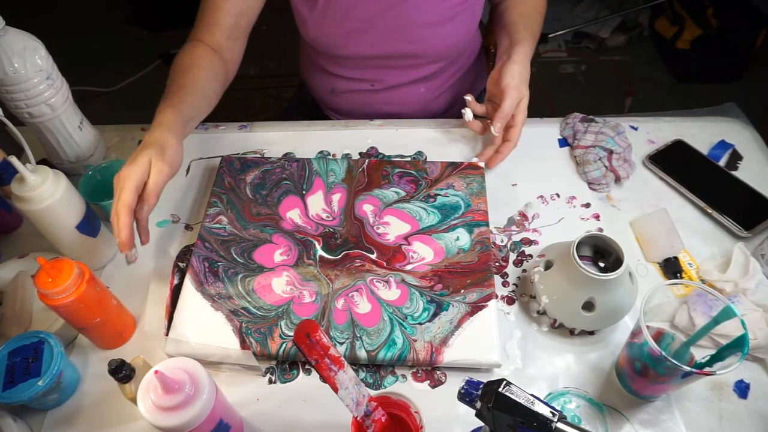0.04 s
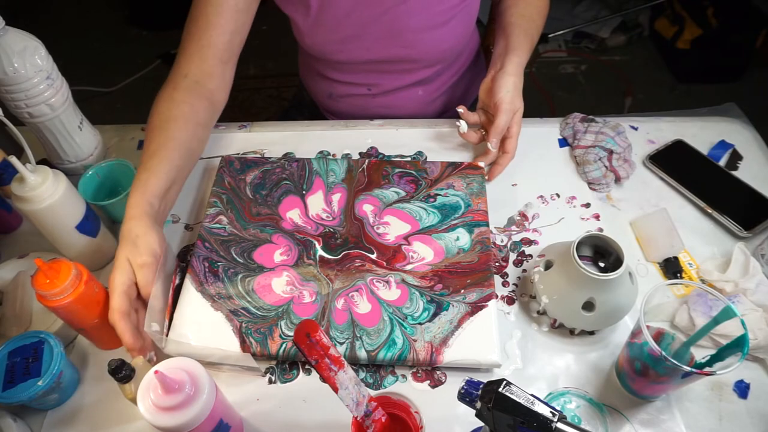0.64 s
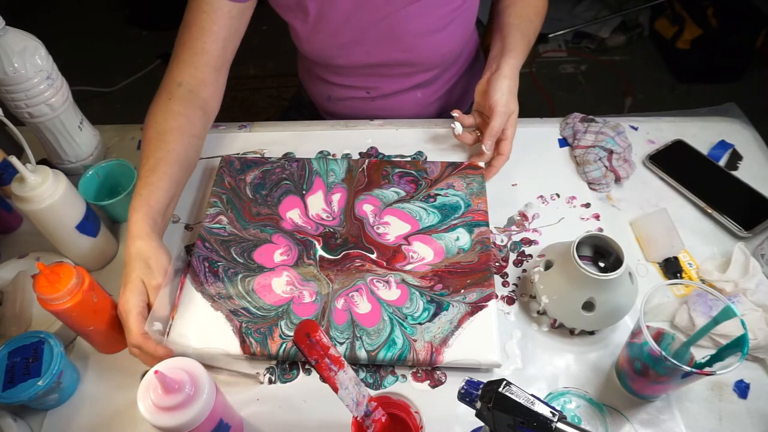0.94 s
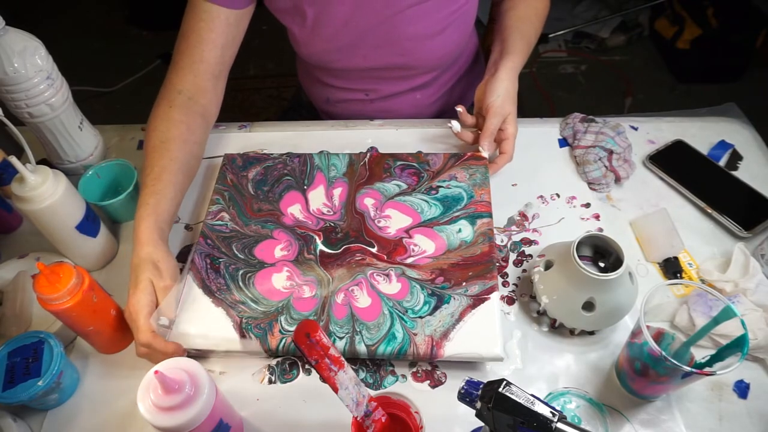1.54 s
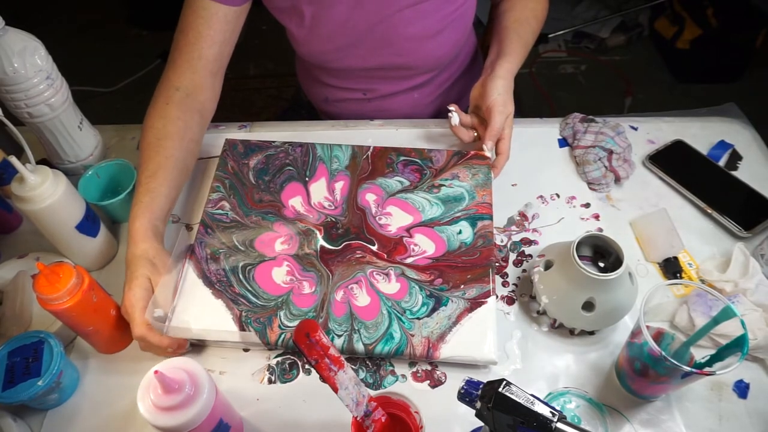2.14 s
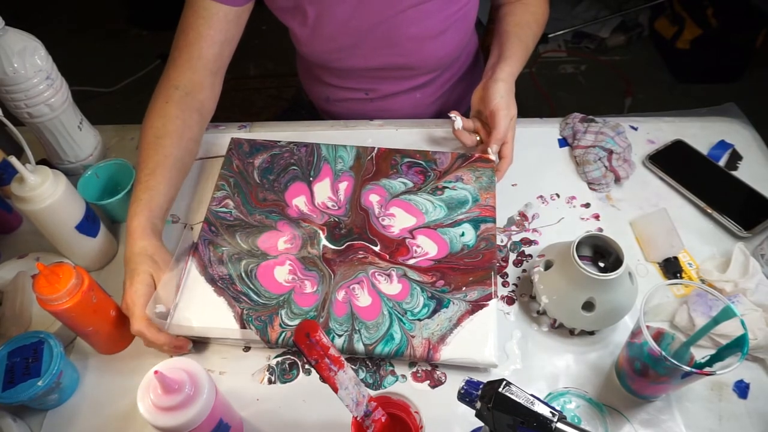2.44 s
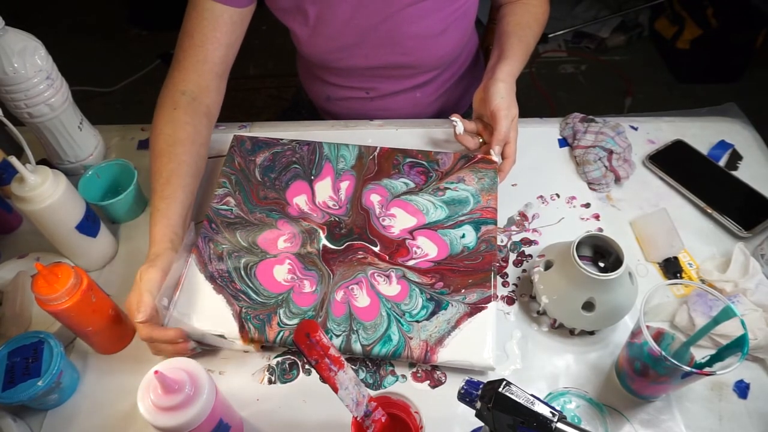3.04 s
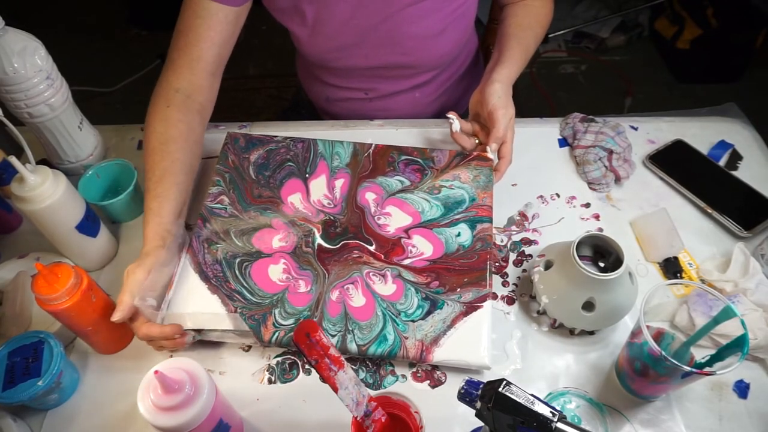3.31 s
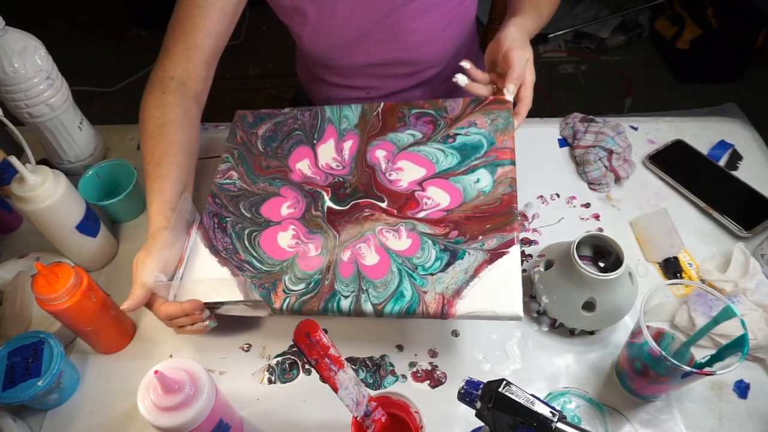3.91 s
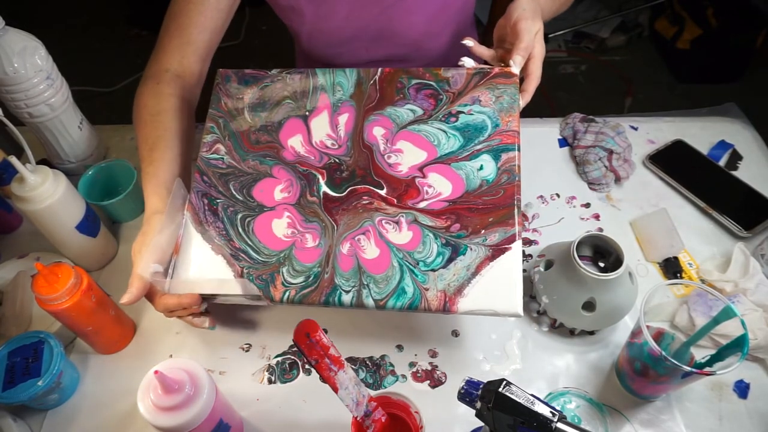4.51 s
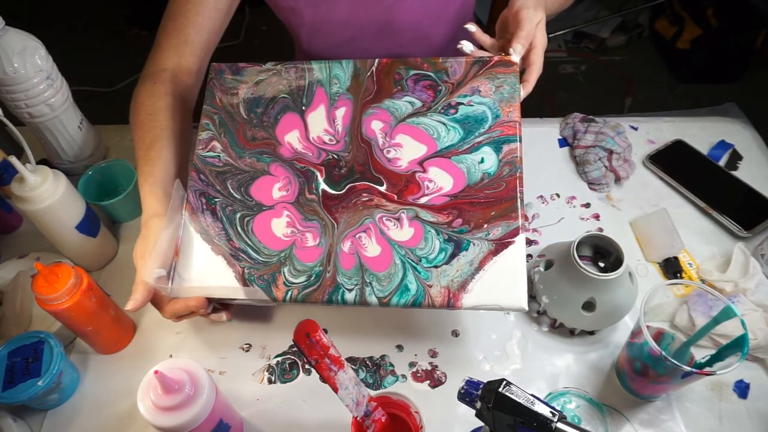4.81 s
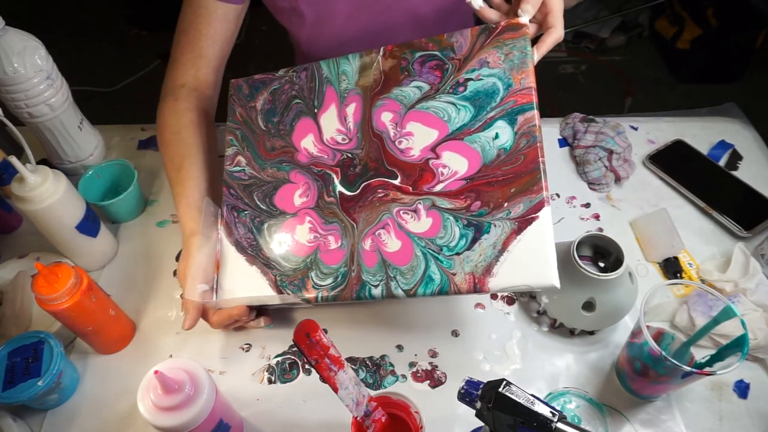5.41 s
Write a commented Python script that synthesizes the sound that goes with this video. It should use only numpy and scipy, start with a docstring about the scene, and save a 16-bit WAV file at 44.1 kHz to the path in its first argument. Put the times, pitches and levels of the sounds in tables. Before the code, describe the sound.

A canvas stretched on a wooden frame is handled on a work table. Soft rubbing leads to one sharp, hollow tap, then a few dull knocks with a slight drum-like ring, mixed with light ticks, a click, short scrapes and a tiny squeak. The contacts grow faint and give way to fingers brushing the cloth as it is lifted. The sounds are close, in a small quiet room with steady microphone hiss.

```python
"""Handling a framed canvas

A stretched canvas on a wooden frame is gripped, knocked on a work table, then lifted and tilted.
Contacts ring the frame and its cloth: dull knocks, light ticks, short scrapes, a click and a squeak.
One sharp tap rings a small hollow support. Fingers rub the weave. A small room answers, over hiss."""
import sys
import numpy as np
from scipy import signal
from scipy.fft import rfft, irfft
from scipy.io import wavfile
from scipy.ndimage import uniform_filter1d

SR = 44100
rng = np.random.default_rng(int(sys.argv[2]) if len(sys.argv) > 2 else 0)


def transcribe(u):
    """Save the signal u as a 16-bit wav file named by the first command-line argument.

    u: samples, shape (n,) or (channels, n), limited to [-1, 1]; the rate is SR.
    q: integer samples, one column per channel.
    """
    v = np.clip(np.atleast_2d(u).T, -1, 1)
    q = np.round(v * 32767).astype(np.int16)
    wavfile.write(sys.argv[1], SR, q)


N = 245195
TIME_S = np.arange(N) / SR
RING_N = SR // 2
RING_S = np.arange(RING_N) / SR


# Frame-on-table contacts: t/s, level/dB, low edge/Hz, top edge/Hz, t60 factor
KNOCKS = [ (0.8666, -52.5, 234, 804, 1.3), (1.3122, -58, 181, 533, 1.3), (1.329, -60, 170, 456, 0.48),
          (1.497, -53.5, 703, 2320, .55), (1.5193, -50, 700, 1700, .5), (1.533, -49.5, 680, 2370, 1.8),
          (1.5444, -31, 312, 880, 0.71), (1.589, -53.5, 700, 2620, 0.84), (1.6342, -41.5, 210, 660, 0.73),
          (1.8996, -30, 158.6, 1090, 0.46), (1.911, -35.5, 182, 755, 0.97), (1.955, -45, 190, 700, .35),
          (2.0832, -47.5, 1040, 1970, 0.16), (2.255, -57.5, 1090, 2580, 0.18),
          (2.4179, -52, 307, 890, 1.06), (2.532, -46.5, 1140, 1970, 0.36), (2.544, -48.5, 474, 890, 0.89),
          (2.5603, -31.5, 356, 2180, 0.3), (2.61, -52.5, 130, 1900, 0.71), (2.7092, -45, 960, 1790, 1.12),
          (3.074, -55.5, 900, 2900, .6), (3.083, -54.5, 480, 2530, .6), (3.108, -59, 400, 1000, 0.55),
          (3.179, -62, 520, 2500, 2.1), (3.366, -59.5, 240, 700, 1.2), ]

def knocks():
    """The frame is set down, rocks and is nudged."""
    out = np.zeros((2, N))
    for s, db, low_hz, top_hz, ring in KNOCKS:
        add(out, s, knock(db, low_hz, top_hz, ring))
    return out


# Wooden frame modes: f/Hz, level/dB, base t60/s
FRAME_MODES = [(254.6, -0.5, 0.062), (396, -0.5, 0.072), (445.6, 1, .11), (489, -3.5, 0.19),
               (592, -0.5, 0.13), (670, 3.5, 0.076), (702, -3, 0.13), (760, -6.5, 0.039), (840, -25, 0.037),
               (895, -9, 0.043), (983, -2, 0.13), (1180, -5, 0.037), (1170, 4.5, 0.26), (1360, 0, 0.16),
               (1540, -16, 0.055), (1662, -20, 0.037), (1975, -9, 0.058), (2480, 4.5, 0.062),
               (2700, -15, 0.081), (2800, -0.5, 0.14), (3030, 5.5, 0.17)]
# Decay of its dense weak modes: f/Hz, base t60/s
FRAME_CLOUD_T60 = [(150, 0.27), (500, 0.083), (1500, 0.23), (4000, 0.052), (10000, 0.058)]
# Spectrum of those modes: f/Hz, density/dB
FRAME_CLOUD = [(120, 1.5), (400, 0), (1000, -0.5), (2000, 3.5), (10000, -3)]

def knock(db, low_hz, top_hz, ring, right_db=1.5):
    """One contact of the frame: soft, heavy ones thud; hard, light ones tick."""
    ringing = body(FRAME_MODES, FRAME_CLOUD_T60, FRAME_CLOUD, ring, dense_db=11, spot_db=5.5)
    blow = contact(ringing, low_hz, top_hz, crispness_db(top_hz, base_db=-42))
    return at_level(blow, db) * amp([[-right_db / 2], [right_db / 2]])


# Stretched cloth resonances: f/Hz, gain/dB, t60/s
CANVAS_MODES = [(198, 0, 0.22), (286.9, 4, 0.27), (379.5, -2, 0.19), (697, -5.5, 0.074)]

def canvas_boom(shaking):
    """The cloth booms like a slack drum when the frame shakes."""
    out = shaking.copy()
    for hz, db, t60 in CANVAS_MODES:
        q = np.pi * hz * t60 / np.log(1000)
        out += amp(db) * signal.lfilter(*signal.iirpeak(hz, q, fs=SR), shaking)
    return out


# Hollow support modes: f/Hz, level/dB, base t60/s
SUPPORT_MODES = [(383, -4, 0.11), (453, 9, 0.041), (512, -3, 0.083), (992, -8, 0.071), (1130, -20, 0.091),
                 (1360, -12.5, 0.19), (1562, -9, 0.2), (1665, -11.5, 0.16), (2180, -9, 0.15),
                 (2262, -2.5, 0.14), (2513, -6.5, 0.14), (2640, -5.5, 0.067), (2900, -11, 0.078),
                 (3700, -30, 0.07)]
# Decay of its dense weak modes: f/Hz, base t60/s
SUPPORT_CLOUD_T60 = [(500, 0.06), (2000, 0.24), (5000, 0.031), (10000, 0.13)]
# Spectrum of those modes: f/Hz, density/dB
SUPPORT_CLOUD = [(300, 1), (750, -6.5), (1500, 3), (2600, 3), (3800, -6), (10000, -3.5)]

def tap(start_s=1.0392, db=-34):
    """A hard tap rings the hollow support under the canvas."""
    out = np.zeros((2, N))
    ringing = body(SUPPORT_MODES, SUPPORT_CLOUD_T60, SUPPORT_CLOUD, ring=0.98, dense_db=0.5, spot_db=1)
    blow = contact(ringing, low_hz=273, top_hz=5600, crisp_db=-13.5)
    add(out, start_s, at_level(blow, db))
    return out


# Click modes: f/Hz, level/dB, base t60/s
CLICK_MODES = [(1480, -6.5, 0.044), (2020, -14, 0.032), (2410, -2.5, 0.022), (3000, 1, 0.02),
               (3360, -6, 0.016), (4250, -21, .02)]
# Decay of its dense weak modes: f/Hz, base t60/s
CLICK_CLOUD_T60 = [(1000, 0.037), (10000, 0.045)]

def click(start_s=1.929, db=-40):
    """A bright, weightless snap as the frame settles."""
    out = np.zeros((2, N))
    ringing = body(CLICK_MODES, CLICK_CLOUD_T60, FRAME_CLOUD,
                   ring=0.75, dense_db=-1.5, spot_db=0.3, front_db=-10)
    blow = contact(ringing, low_hz=900, top_hz=4240, crisp_db=-9.5)
    add(out, start_s, at_level(blow, db))
    return out


# Stick-slip contour: t/s, slip rate/Hz, level/dB
SQUEAK_CONTOUR = [(2.704, 589, -63), (2.709, 575.5, -39.5), (2.714, 547, -44.5), (2.722, 529.6, -61),
                  (2.74, 487, -51.5)]
# Stick-slip harmonics: order, relative level/dB
SQUEAK_HARMONICS = [(1, -4.5), (2, 2), (3, -10), (4, -31), (5, -1), (6, -9.5), (8, -16)]

def squeak(jitter=0.0126):
    """Near-regular slips slow down as the frame comes to rest."""
    s, rate_hz, db = np.transpose(SQUEAK_CONTOUR)
    uneven = 1 + jitter * smooth_noise(window_samples=80)
    turns = np.cumsum(np.interp(TIME_S, s, rate_hz) * uneven) / SR
    tone = sum(amp(level) * np.sin(2 * np.pi * (order * turns + rng.random()))
               for order, level in SQUEAK_HARMONICS)
    gate = (TIME_S > s[0]) & (TIME_S < s[-1])
    return unit_rms(tone) * amp(np.interp(TIME_S, s, db)) * gate


# Frame drags on the table: t/s, length/s, level/dB, low edge/Hz, top edge/Hz
SCRAPES = [ (0.698, 0.088, -72.5, 370, 477), (1.845, 0.051, -57.5, 830, 1280),
           (2.168, 0.11, -62, 203, 1380), (2.561, 0.081, -50, 380, 1870), (2.709, 0.025, -48, 1100, 2310),
           (3.038, 0.024, -50.5, 420, 2900), (3.34, 0.048, -59.5, 575, 2380), ]

def scrapes(slips_per_s=900):
    """Tiny uneven slips shake the frame as it drags."""
    out = np.zeros((2, N))
    for s, length_s, db, low_hz, top_hz in SCRAPES:
        chance, size = rng.random((2, RING_N))
        stroke = np.sqrt(np.interp(RING_S / length_s, [0, 0.2, 1], [0, 1, 0]))
        slips = stroke * (chance < slips_per_s / SR) * (size - 0.5)
        ringing = body(FRAME_MODES, FRAME_CLOUD_T60, FRAME_CLOUD, ring=0.58, dense_db=15.5, spot_db=4)
        shaken = signal.fftconvolve(slips[None], ringing, axes=1)
        drag = contact(shaken, low_hz, top_hz, crispness_db(top_hz, base_db=-36.5))
        add(out, s, amp(db) * np.sqrt(length_s * SR) * unit_energy(drag))
    return out


# Noise swells (at 0.992 s the tap's noisy ring-out, elsewhere rubbing): t/s, length/s, peak level/dB
SWELLS = [ (0.476, .18, -70.5), (0.662, 0.38, -60.5), (0.992, 0.21, -55), (1.796, 0.21, -57),
          (1.98, 0.35, -65), (3.097, 0.4, -65), (3.953, .13, -61), (4.222, 0.14, -58), (4.73, .08, -68), ]

def swish_gain(grip_s=0.94, rest_s=4.9, fade_s=0.3, grip_db=-68.5, db_per_s=-1.2):
    """Separate swells over the rustle of a settling grip."""
    held = np.clip(np.minimum(TIME_S - grip_s, rest_s - TIME_S) / fade_s + 0.5, 0, 1)
    power = (held * amp(grip_db + db_per_s * (TIME_S - grip_s))) ** 2
    for s, length_s, db in SWELLS:
        swell = np.interp((TIME_S - s) / length_s, [0, 0.4, 1], [0, 1, 0])
        power += (amp(db) * swell) ** 2
    return np.sqrt(power)


# Canvas swish spectrum: f/Hz, density/dB
SWISH_SPECTRUM = [(50, -39), (130, -23), (250, -14), (450, 1.5), (750, 0.5), (1100, -1.5), (1700, 2.5),
                  (2000, -0.5), (2450, 0.5), (3800, -12), (7000, -15), (11000, -21)]
# Stereo image of close sources: f/Hz, L-R correlation
NEAR_CORRELATION = [(300, 1), (800, 0.82), (2000, 0.3), (5000, 0.59), (10000, 0.11)]

def canvas_swish(grain_db=2.5, lift_s=3.75, fade_s=0.36, lifted_low_hz=1050):
    """Grainy noise of skin on the weave and of the tap's ring-out; thinner once off the table."""
    grain = unit_rms(amp(grain_db * smooth_noise(window_samples=300)))
    swish = noise(N, SWISH_SPECTRUM, NEAR_CORRELATION) * grain * swish_gain()
    thin = butter(swish, 2, lifted_low_hz, "high")
    lifted = np.clip((TIME_S - lift_s) / fade_s + 0.5, 0, 1)
    return (1 - lifted) * swish + lifted * thin


def ticks(span_s=(2.4, 3.7), per_s=5, db=-65.5, spread_db=5):
    """Faint, hard, uneven touches as the frame is worked off the table."""
    out = np.zeros((2, N))
    for s in np.arange(*span_s, 1 / per_s):
        late_s = rng.random() / per_s
        tick_db = db + spread_db * rng.uniform(-1, 1)
        add(out, s + late_s, knock(tick_db, low_hz=765, top_hz=2660, ring=0.28))
    return out


# Reflections off nearby surfaces: delay/s, gain
ECHOES = [(.0024, 0.053), (.0054, 0.1), (0.0113, .2), (0.0177, 0.2)]
# Room decay: f/Hz, t60/s
ROOM_T60 = [(150, 0.48), (400, 0.43), (1500, 0.47), (4000, 0.51), (10000, 0.068)]
# Room tail spectrum: f/Hz, density/dB
ROOM_SPECTRUM = [(100, 0), (300, -2.5), (700, -2), (2000, -1.5), (5000, 7.5), (10000, -0.5)]
# Stereo image of tail and hiss: f/Hz, L-R correlation
DIFFUSE_CORRELATION = [(60, 1), (250, 0.41), (500, 0), (1000, 0), (2500, 0), (5000, 0), (10000, 0.17)]

def room(x, tail_db, build_s=0.021):
    """Direct sound, single echoes, then a short diffuse tail."""
    near = x.copy()
    for delay_s, gain in ECHOES:
        add(near, delay_s, gain * x)
    tail = decaying_noise(ROOM_T60, ROOM_SPECTRUM, DIFFUSE_CORRELATION) * np.minimum(RING_S / build_s, 1)
    return near + amp(tail_db) * signal.fftconvolve(x, unit_energy(tail), axes=1)[:, :N]


# Microphone hiss spectrum: f/Hz, density/dB
HISS_SPECTRUM = [(20, -52), (70, -34), (150, -22), (280, -10.5), (430, -7), (600, 2), (760, -3.5),
                 (950, 2.5), (1220, -1), (1550, 0.5), (2100, -2), (5000, -4.5), (11000, -8), (13000, -105)]
# Mains harmonics: order, rms level/dB
HUM_HARMONICS = [(8, -86.5), (26, -93), (28, -92.5), (48, -87.5)]

def background(hiss_db=-65.33, mains_hz=60):
    """Steady microphone hiss and faint electrical hum."""
    hum = sum(amp(db) * np.sqrt(2) * np.sin(2 * np.pi * (order * mains_hz * TIME_S + rng.random()))
              for order, db in HUM_HARMONICS)
    return amp(hiss_db) * noise(N, HISS_SPECTRUM, DIFFUSE_CORRELATION) + hum


def body(modes, cloud_t60, cloud_spectrum, ring, dense_db, spot_db, front_db=-7):
    """Struck body: clear modes, a cloud of weak ones and a sharp front; ring scales every t60."""
    hz, db, t60 = np.transpose(modes)[:, :, None]
    polarity = (-1) ** np.arange(len(hz))[:, None]
    weight = polarity * amp(db + spot_db * rng.standard_normal(hz.shape))  # varies with the spot hit
    clear = (weight * amp(-60 * RING_S / (t60 * ring)) * np.sin(2 * np.pi * hz * RING_S)).sum(0)
    cloud = decaying_noise(np.array(cloud_t60) * [1, ring], cloud_spectrum, NEAR_CORRELATION)
    crack = 1 + amp(3) * np.exp(-RING_S / 0.019)  # loudest before the blow spreads
    front = amp(front_db) * signal.unit_impulse(RING_N)  # straight from the contact point
    return unit_energy(clear) + amp(dense_db) * (unit_energy(cloud * crack) + front)


def contact(x, low_hz, top_hz, crisp_db, push_db=-42, radiation_hz=116):
    """A contact drives one band; its hard edge leaks treble, its push leaks bass."""
    soft = butter(x, 4, top_hz, "low")
    driven = butter(soft + amp(crisp_db) * x, 3, low_hz, "high")
    radiated = butter(driven, 4, radiation_hz, "high")  # small bodies radiate little bass
    return radiated + amp(push_db) * soft


def crispness_db(top_hz, base_db, base_hz=1010, db_per_octave=14.5):
    """Harder contacts have a crisper edge."""
    return base_db + db_per_octave * np.log2(top_hz / base_hz)


def decaying_noise(t60s, spectrum, correlation, bands=12):
    """Stereo noise, each band dying at its own rate."""
    white = rfft(noise(RING_N, [(1, 0)], correlation))
    hz = np.fft.rfftfreq(RING_N, 1 / SR)
    centres_hz = np.geomspace(130, 11000, bands)
    out = 0
    for centre_hz, row in zip(centres_hz, np.eye(bands)):
        band = lookup(np.c_[centres_hz, row], hz)
        ringing = unit_energy(irfft(white * band) * amp(-60 * RING_S / lookup(t60s, centre_hz)))
        out += amp(lookup(spectrum, centre_hz)) * np.sqrt(band.mean()) * ringing
    return unit_energy(out)


def noise(size, spectrum, correlation):
    """Shaped stereo noise, rms 1."""
    hz = np.fft.rfftfreq(size, 1 / SR)
    mid, side = rfft(rng.standard_normal((2, size)))
    same = np.clip(lookup(correlation, hz), -1, 1)
    mid, side = mid * np.sqrt(1 + same), side * np.sqrt(1 - same)
    return unit_rms(irfft(np.array([mid + side, mid - side]) * amp(lookup(spectrum, hz)), size))


def smooth_noise(window_samples):
    """Moving-average noise, rms 1."""
    return unit_rms(uniform_filter1d(rng.standard_normal(N), size=window_samples))


def butter(x, order, hz, kind):
    """Low- or high-pass."""
    return signal.sosfilt(signal.butter(order, hz, kind, fs=SR, output="sos"), x)


def at_level(x, db):
    """Sets the rms of a blow's first 12 ms."""
    return amp(db) * x / np.sqrt(np.mean(x[:, :round(0.012 * SR)] ** 2))


def amp(db):
    """dB to gain."""
    return 10 ** (np.asarray(db) / 20)


def unit_rms(x):
    """Scales to rms 1."""
    return x / np.sqrt(np.mean(x ** 2) + 1e-20)


def unit_energy(x):
    """Scales to energy 1 per channel."""
    return x / np.sqrt(np.sum(x ** 2, axis=-1, keepdims=True) + 1e-20)


def lookup(points, hz):
    """Interpolates on a log-frequency axis."""
    points_hz, value = np.transpose(points)
    return np.interp(np.log(hz + 1), np.log(points_hz + 1), value)


def add(mix, s, sound):
    """Mixes a stereo sound in at time s."""
    part = mix[:, round(s * SR):][:, :sound.shape[1]]
    part += sound[:, :part.shape[1]]


def scene():
    """Handling sounds in the room over the background; tap and click are drier."""
    sharp = room(tap(), tail_db=-16) + room(click(), tail_db=-17)
    floor = background()
    handling = squeak() + canvas_swish()
    frame = canvas_boom(knocks() + scrapes() + ticks())
    return room(frame + handling, tail_db=-11.5) + sharp + floor


def record(dry, edge_hz=11200):
    """Steep treble cut-off."""
    low_pass = signal.firwin(401, edge_hz, window=("kaiser", 8), fs=SR)
    return signal.oaconvolve(dry, low_pass[None], "same")


dry = scene()
out = record(dry)
transcribe(out)
```